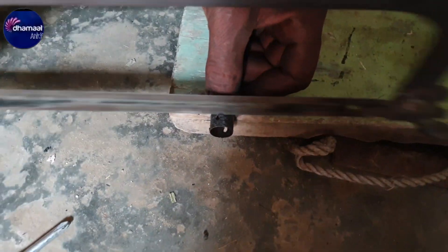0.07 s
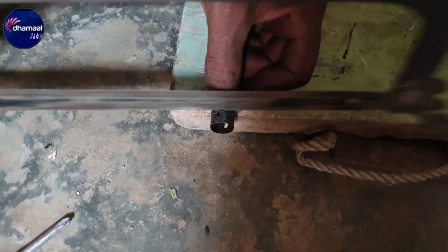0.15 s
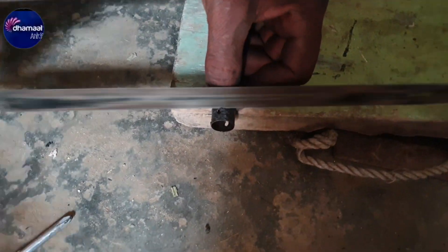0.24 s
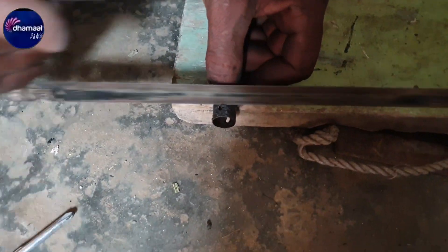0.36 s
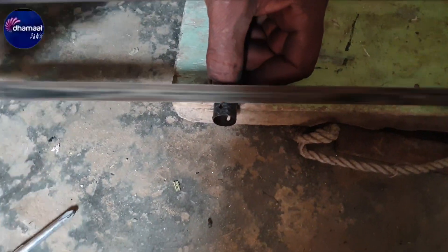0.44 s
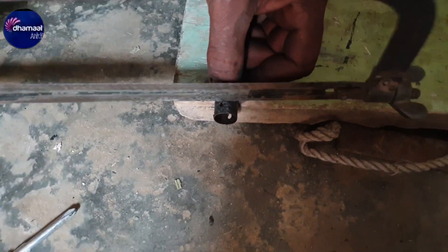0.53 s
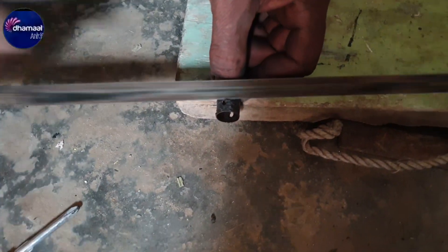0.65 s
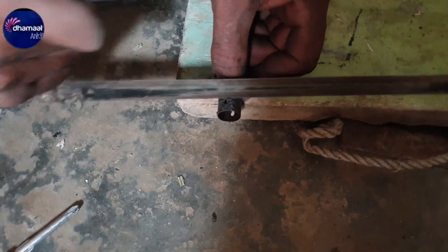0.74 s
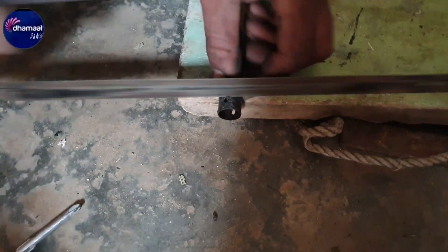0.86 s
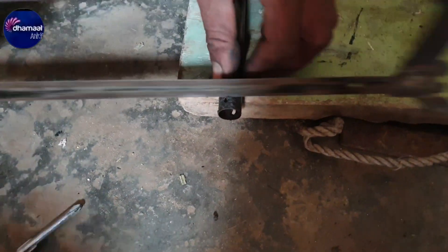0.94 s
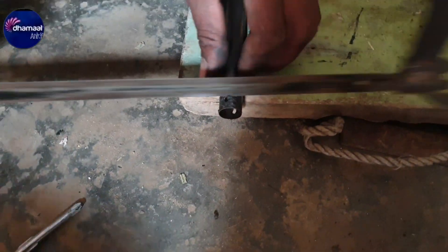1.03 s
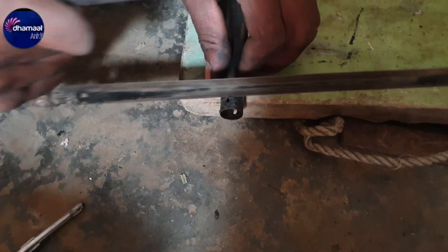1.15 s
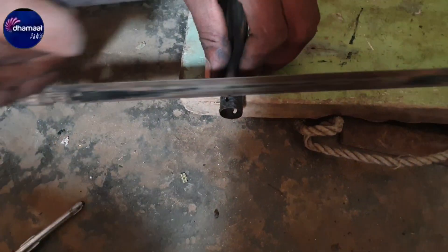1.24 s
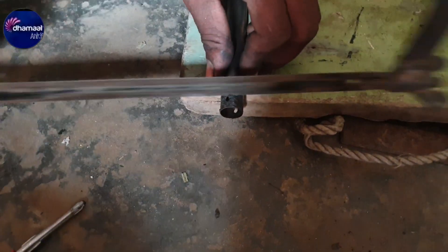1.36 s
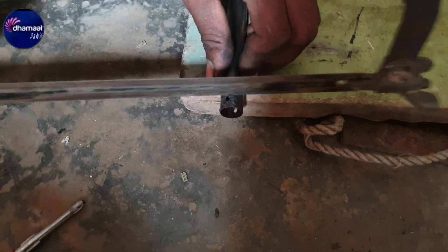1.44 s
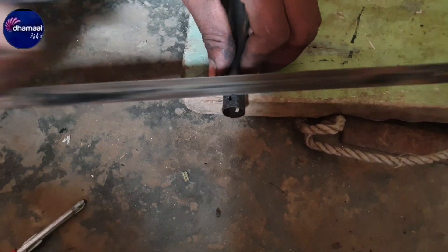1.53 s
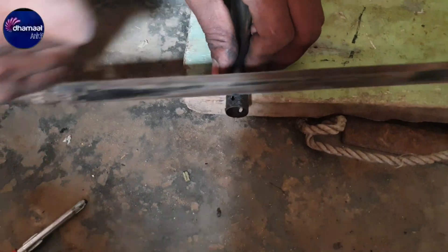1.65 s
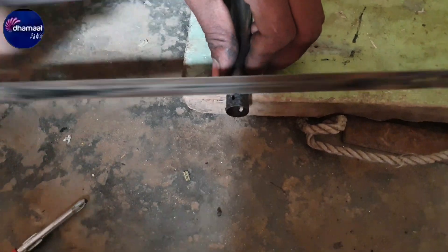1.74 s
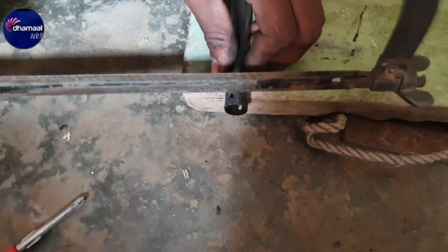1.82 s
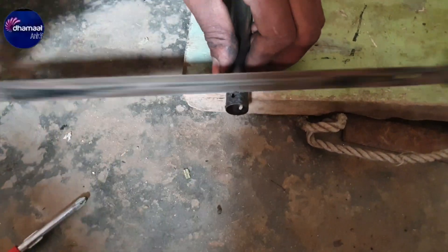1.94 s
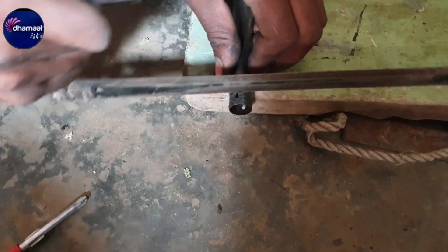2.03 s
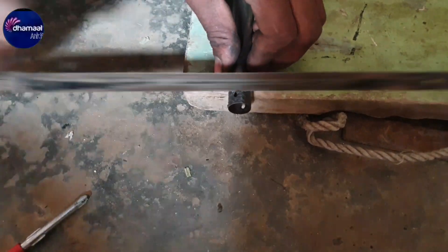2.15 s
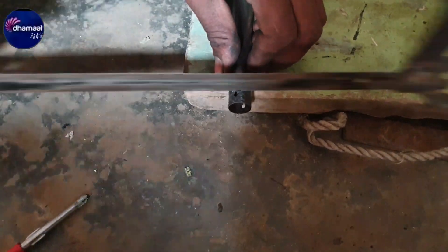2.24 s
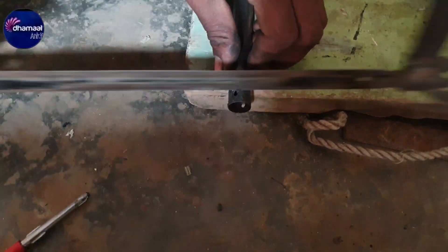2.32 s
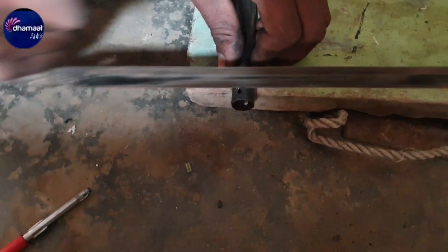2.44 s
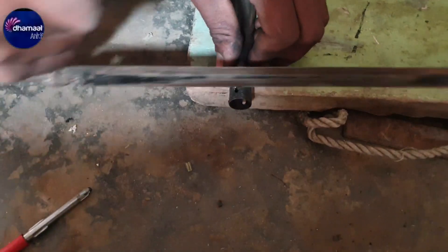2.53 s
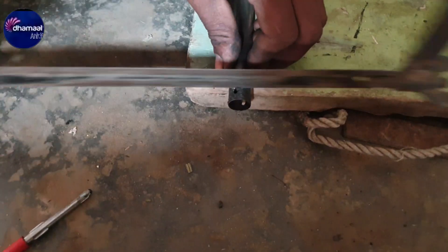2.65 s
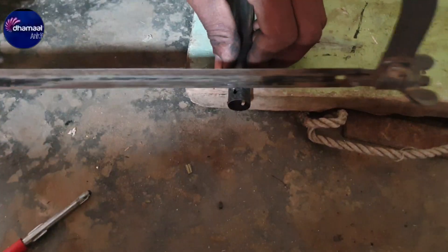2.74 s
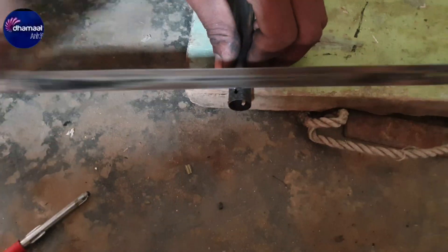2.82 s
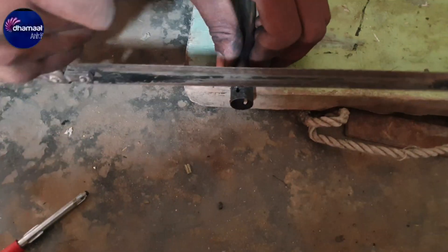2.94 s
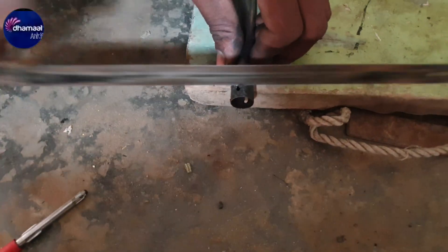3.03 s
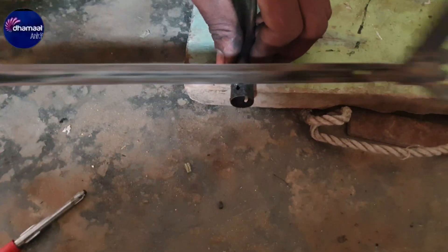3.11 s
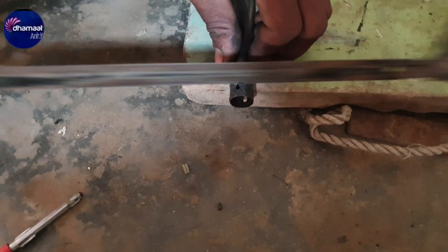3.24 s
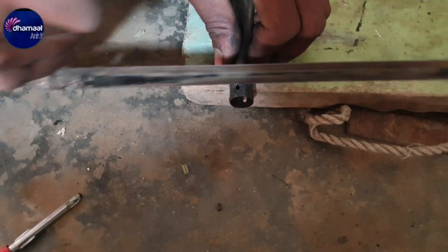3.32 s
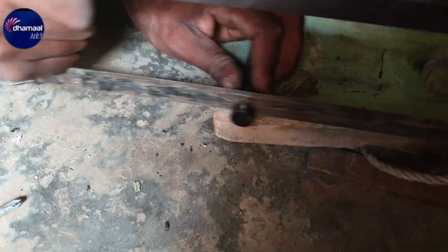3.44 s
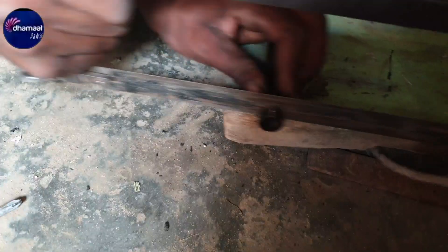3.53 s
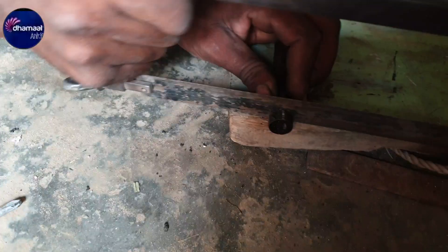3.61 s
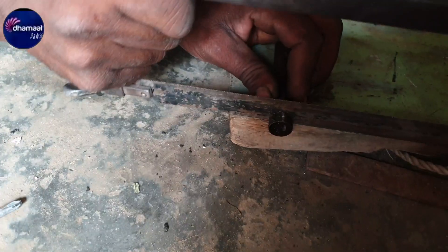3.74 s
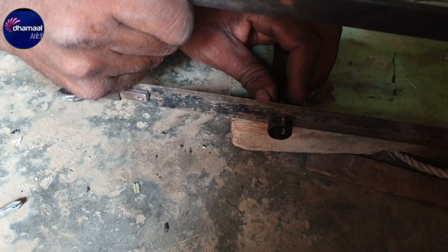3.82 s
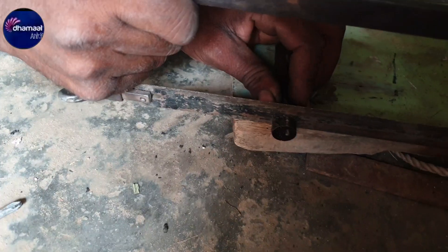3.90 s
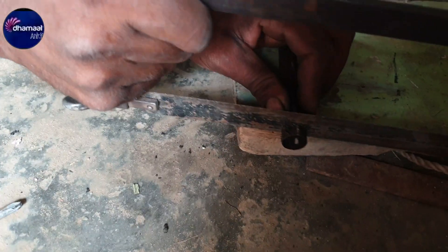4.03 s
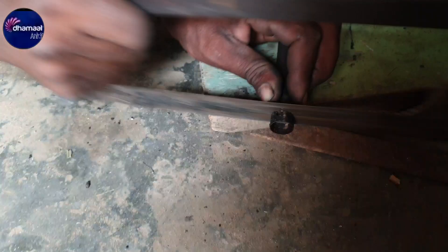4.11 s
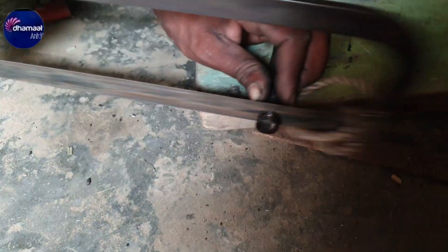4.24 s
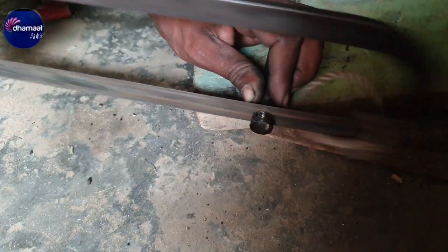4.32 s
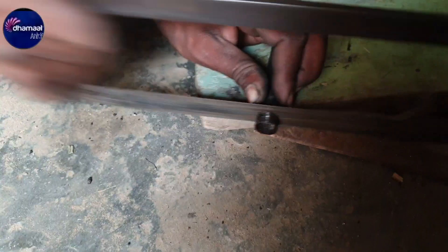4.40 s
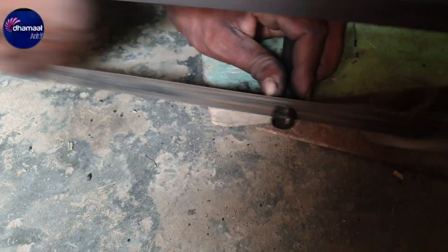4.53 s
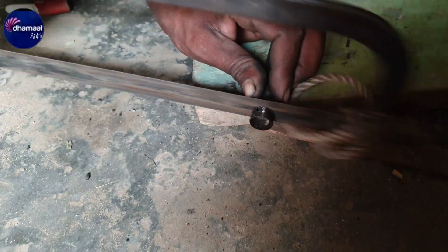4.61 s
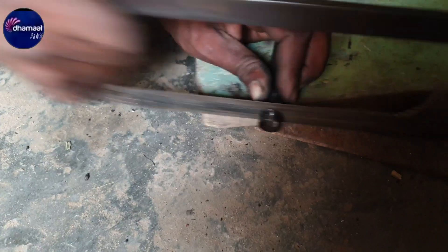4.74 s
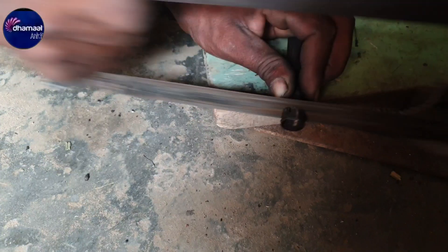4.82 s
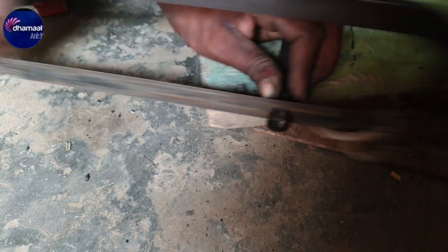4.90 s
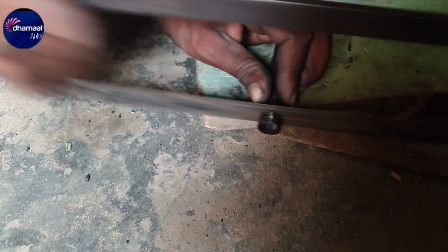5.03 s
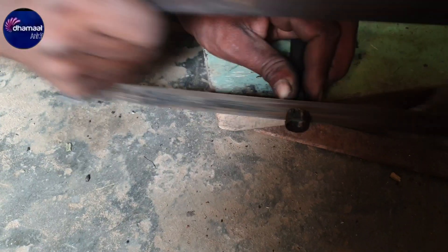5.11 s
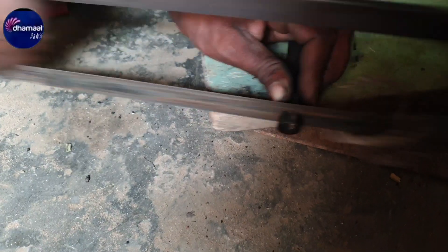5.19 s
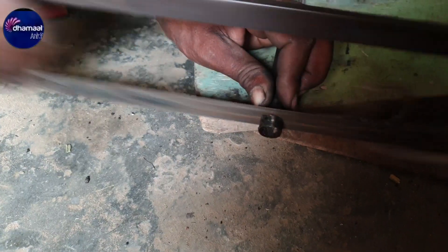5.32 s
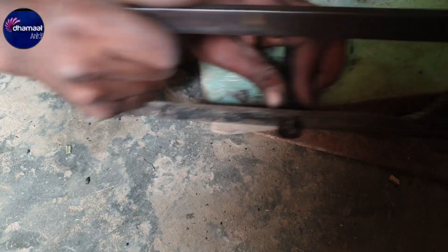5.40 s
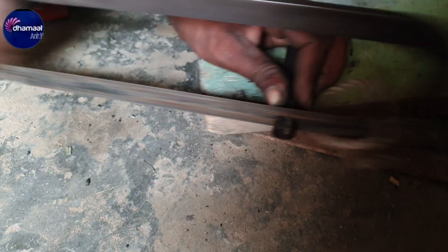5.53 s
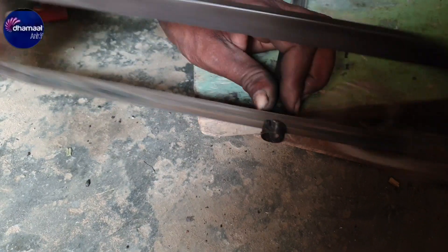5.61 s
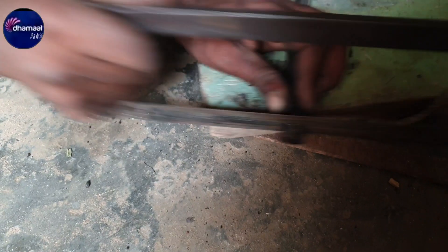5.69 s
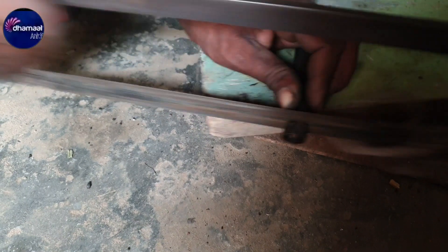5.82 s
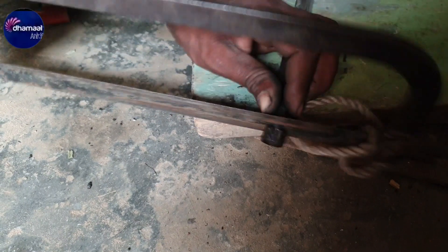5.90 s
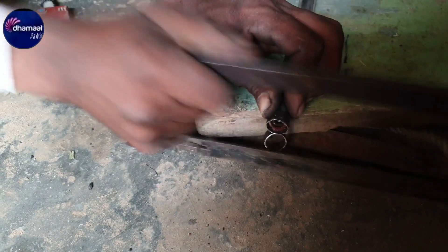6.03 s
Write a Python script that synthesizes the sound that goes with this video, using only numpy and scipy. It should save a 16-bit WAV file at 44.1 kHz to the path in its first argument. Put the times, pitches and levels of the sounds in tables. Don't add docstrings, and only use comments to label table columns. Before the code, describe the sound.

A hacksaw rasps rapidly back and forth through a small metal pipe, pauses briefly, then resumes faster with hard wooden knocks.

```python
import sys
import numpy as np
from scipy import signal
from scipy.fft import rfft, irfft, next_fast_len
from scipy.io import wavfile
from scipy.ndimage import uniform_filter1d

SR = 44100
rng = np.random.default_rng(int(sys.argv[2]) if len(sys.argv) > 2 else 0)


def undo_db(level):
    steps = np.asarray(level, float) / 20
    return 10 ** steps


def generate_wav(signal):
    frames = np.transpose(np.atleast_2d(signal))
    scaled = np.clip(frames, -1, 1) * 32767
    pcm = np.round(scaled).astype(np.int16)
    wavfile.write(sys.argv[1], SR, pcm)


N = 267246
T = np.arange(N) / SR
SECOND_BOUT_S = 4.1125

# frequency in Hz, width in Hz, resting level in dB.
HUM_LINES = [
    (50.5, 16, -50.5),
    (136.6, 5.2, -68),
    (186, 21, -57),
    (214.5, 11, -58),
    (385, 16, -66),
]
# peak time in seconds, level in dB, rise in seconds, fall in seconds.
HUM_SWELLS = [
    [(.04, -37.5, .05, 0.069), (.5, -31, 0.095, 0.058), (1.65, -43, 0.25, 0.46), (3.72, -51, .06, 0.079), (4.05, -43, 0.059, 0.065), (4.36, -48, .08, 0.05), (5.85, -51, 0.12, 0.078)],
    [(3.63, -37, .03, .05), (3.71, -34, 0.039, 0.061), (3.79, -38, .05, .02), (3.89, -42, .02, .02), (3.97, -37, 0.045, .05), (4.3, -47, .25, 2.5)],
    [(1.7, -50, .5, 0.67), (3, -48.5, .5, 0.044), (3.62, -44.5, 0.036, 0.46), (5.86, -45, 0.048, 0.054)],
    [(.65, -51, 0.75, .1), (3.7, -58, .06, 0.26), (5.87, -48, 0.044, .04)],
    [(.33, -37, .08, .3), (1.18, -37.5, 0.092, .2), (2.55, -36, 0.088, .15), (3.03, -31, 0.095, 0.026), (3.4, -46, 0.099, .1)],
]
# time in seconds, frequency in Hz, level in dB.
ENGINE_PATH = [(1.0, 62.4, -49), (1.34, 62.8, -47), (1.51, 58.45, -44), (1.78, 63.8, -47),
               (3.08, 65.2, -38.5), (3.11, 65.3, -52), (3.6, 65, -49)]
# frequency in Hz, level in dB per Hz.
AIR_SPECTRUM = [(15, -51), (25, -26), (53, -9), (77, 6), (139, 7.5), (202, -14), (257, 6), (286, 7.5),
                (383, 3.5), (729, 1.5), (1240, -4.5), (3400, -20), (7480, -22), (11000, -37), (15000, -55)]

# start in seconds, fastest tooth rate in Hz, cutting force in dB, frame ring over it in dB,
# place of the crest from 0 to 1.
FIRST_BOUT = [(-.02, 1017, -31, 16.5, 0.37), (.19, 1350, -26, 4.5, 0.46), (.402, 1397, -25.5, 8, 0.37),
              (.605, 1411, -22, 4, 0.59), (.826, 1327, -26.5, 13, 0.36), (1.046, 1282, -26.5, 6, 0.55),
              (1.259, 1269, -28, 8, 0.46), (1.486, 1294, -25.5, 4.5, 0.45), (1.688, 1010, -29, 7.5, 0.47),
              (1.909, 1270, -27, 6, 0.47), (2.122, 1350, -29, 10.5, 0.53), (2.343, 1273, -26, 4, 0.42),
              (2.563, 1279, -28.5, 11, 0.43), (2.784, 1263, -23.5, 4.5, 0.46), (2.996, 1244, -29, 10, .36),
              (3.215, 847.7, -33.5, 5.5, 0.46), (3.432, 1297, -23.5, 6.5, 0.55),
              (3.75, 502, -70, -18, 0.22), (3.885, 499, -62.5, 30.5, .2), (3.95, 498.6, -55, -3, 0.19),
              (4.12, 485.7, -58, 0, .5)]
SECOND_BOUT = [(4.06, 902, -19, 2, 0.48), (4.253, 1402, -18, -1.5, 0.41), (4.409, 1307, -23, -1.5, 0.51),
               (4.571, 1492, -22, -3.5, 0.4), (4.729, 1203, -19, -2, 0.48), (4.898, 1350, -23, -4, 0.46),
               (5.047, 1298, -22, -1.5, 0.44), (5.217, 1496, -25, -4.5, 0.49), (5.367, 1306, -26, 2, 0.45),
               (5.537, 1507, -27, -2.5, .45), (5.681, 1160, -22.5, 6, 0.48), (5.855, 1504, -19.5, -6, 0.51),
               (6.005, 904, -37, 3.5, 0.27), (6.08, 891, -46, -1, .5)]
# time in seconds, unevenness from 0 to 1.
UNEVEN_BITE = [(0, 0.19), (.5, 0.29), (.7, 0.36), (2.4, 0.55), (3.1, 0.29), (4.1, 0.34), (5, 0.29),
               (5.5, 0.5), (5.77, 0.29)]
# frequency in Hz, width in Hz, level in dB.
FRAME_MODES = [
    [(722, 24, 3), (745, 24, 2), (777.3, 24.4, -0.5), (857.2, 18, -3), (877.3, 19, -3), (904, 25, -8.5)],
    [(653.5, 16, -11.5), (711.5, 15.7, 2.5), (768, 28, -4.5), (862, 18.4, 2.5), (914, 49, -16)],
]
# frequency in Hz, width in Hz, level in dB.
BLADE_MODES = [
    [(990, 34, -2.5), (1040, 14, -4), (1190, 24, -24), (1256, 26, 0.5), (1350, 35, 0), (1368.3, 47, 2.5), (1580, 49, -17.5), (1715, 25, -3), (1950, 49, -9), (2056, 67, -2.5), (2167, 12, -15), (2434, 22, -8), (2753, 49, -14), (2837, 36, -8.5)],
    [(1176, 450, -14), (1565, 43, -1), (1720, 40, -10.5), (1997, 93, -3.5), (2410, 44, -13.5), (2494, 27, -7)],
]
# frequency in Hz, level in dB per Hz.
BLADE_BED = [
    [(120, -61), (200, -36.5), (374, -16), (610, -27), (736, -21), (1110, -13), (1260, -9), (1470, -14), (2080, -16.5), (4000, -36.5), (5200, -69), (8800, -120)],
    [(120, -55), (200, -45), (475, -7), (709, -1.5), (970, -6), (1140, -9), (2010, -6), (3530, -11), (4000, -8), (5200, -53), (8800, -120)],
]
# frequency in Hz, level in dB per Hz.
CHIP_SPECTRUM = [
    [(1760, -5), (3000, -8.5), (3260, -20), (3540, -10), (4160, -13), (4740, -7), (5300, -7.5), (5880, -2.5), (6310, -4), (9240, -12.5), (12000, -21.5), (14900, -19.5), (15800, -46)],
    [(1760, -21), (3000, -12), (3240, -13), (3590, -40), (3930, -12.5), (4280, -15.5), (4710, -12.5), (5610, -1.5), (6310, -7), (8680, -8.5), (9700, -16.5), (14800, -27.5), (15800, -23)],
]
PATCH_HZ = [3200, 4200, 5200, 6100, 7100, 8300, 9700, 11500, 13500]
PIPE_HZ = [3636, 4853, 5305, 5470, 5545, 5690, 5900, 6110, 6604, 7575, 8470, 9390]
# width in Hz, level in dB.
PIPE_RINGS = [(25, -18), (25, -18), (12, -20), (10, -14), (9, -13), (14, -11), (11, -13), (12, -17),
              (9, -14), (20, -28), (25, -18), (12, -12)]

# start in seconds, length in seconds, pitch in Hz, level in dB.
SQUEALS = [(0.026, 0.03, 736, -13), (1.119, 0.036, 726, -11.5), (1.546, 0.025, 740, -11),
           (1.786, 0.046, 722, -10), (2.86, 0.036, 736, -14), (3.07, 0.065, 740, -8.5),
           (3.289, 0.019, 791, -15), (3.312, 0.015, 782.6, -18), (3.511, 0.075, 761, -10.5),
           (5.748, 0.052, 1157, -12), (5.908, 0.012, 1247, -10), (4.127, 0.019, 1990, -17),
           (3.026, 0.075, 2167, -30), (0.05, 0.049, 995, -11.5), (0.423, 0.035, 760, -15),
           (1.748, 0.034, 995, -14.5), (2.231, 0.089, 770, -20), (4.119, 0.058, 718, -18.5),
           (0.063, 0.032, 1950, -25), (4.3, 0.024, 1350, -19), (4.332, 0.021, 1560, -18.5),
           (4.477, 0.027, 1307, -21), (4.65, 0.028, 1565, -21), (4.782, 0.018, 1150, -20),
           (4.835, 0.032, 871, -20), (4.873, 0.033, 876, -28), (0.476, 0.048, 1355, -19),
           (2.66, 0.047, 1260, -21), (0.263, 0.078, 1310, -19.5), (1.728, 0.031, 1248, -21.5),
           (1.81, 0.037, 1270, -19.5), (2.21, .07, 1270, -24), (2.391, 0.041, 1239, -20),
           (2.0, 0.034, 782, -19.5), (2.84, 0.031, 1263, -23), (3.585, 0.038, 754, -17),
           (3.641, 0.084, 1080, -37), (.12, 0.042, 730, -16), (3.915, 0.044, 800, -46),
           (5.11, .04, 1297, -26), (.44, .03, 950, -20), (.458, .025, 1160, -20), (.86, .04, 2050, -24),
           (.01, .025, 735, -15), (3.165, .016, 765, -19), (3.137, .016, 750, -17), (1.585, .03, 750, -17),
           (1.3, .03, 760, -19), (2.7, .06, 760, -19)]
# start in seconds, length in seconds, pitch in Hz,
# level in dB.
CHIRPS = [(1.11, .08, 1250, -22), (1.53, .025, 1275, -22), (1.585, .05, 1280, -24), (3.05, .035, 1260, -22),
          (3.11, .04, 1270, -23), (3.04, .03, 1000, -23), (3.29, .06, 865, -25), (3.24, .06, 1260, -30),
          (3.525, .022, 1260, -19), (3.56, .018, 1400, -20), (3.592, .018, 1400, -21),
          (5.39, .11, 722, -22), (5.285, .055, 850, -25), (5.595, .05, 855, -26), (5.28, .06, 1560, -28),
          (5.12, .04, 800, -21), (5.728, .028, 900, -18), (5.798, .03, 920, -18), (5.912, .03, 1590, -24),
          (6.018, .04, 722, -30)]
# start in seconds, length in seconds, pitch in Hz, level in dB.
WHISTLES = [(.245, .03, 6050, -36), (.49, .07, 5720, -34), (2.43, .04, 5700, -34), (2.86, .05, 5690, -35),
            (3.78, .26, 3120, -70), (.1, .2, 5680, -44), (.74, .13, 5660, -43), (.76, .1, 5545, -44),
            (.98, .12, 5665, -48), (1.2, .12, 5650, -49), (1.37, .13, 5665, -44), (2.03, .17, 5545, -46),
            (2.7, .1, 5660, -46), (2.7, .1, 5545, -49), (2.68, .12, 5305, -48), (3.54, .05, 5520, -36),
            (.26, .11, 6604, -42), (.52, .1, 6604, -42), (.78, .08, 6620, -44), (.95, .09, 6604, -44),
            (1.34, .15, 6604, -42), (2.18, .1, 6604, -44), (3.14, .06, 6604, -44), (5.71, .045, 5650, -30),
            (5.795, .04, 5650, -31), (5.9, .1, 5640, -31)]
# start in seconds, length in seconds, pitch in Hz, level in dB.
GROANS = [(5.834, .028, 195, -35), (5.868, .018, 195, -40), (5.886, .028, 195, -36)]
# time in seconds, peak in dB, mode in Hz, lull before it in dB.
SNAGS = [(0.015, -5, 730, 2), (0.032, -1, 750, 3), (0.127, -11, 733, 1), (0.215, -18, 850, 1),
         (0.255, -9, 1230, 9), (0.417, -4, 756, 9), (0.434, -5, 759, 8), (0.472, -2, 1270, 6),
         (0.498, -4, 1260, 3), (0.648, -13, 728, 1), (0.85, -9, 753, 7), (0.871, -2, 970.6, 4),
         (1.079, -13, 725, -1), (1.301, -11, 759.3, 1), (1.369, -5, 719, 5), (1.391, -6.5, 764, 5),
         (1.416, -6, 870, 2), (1.51, -18, 774, 0), (1.551, -8, 743, 4), (1.941, -10, 832, 6),
         (1.967, -5, 738, 3), (2.171, -11, 710, 10), (2.2, -9, 728.4, 3), (2.227, -9, 738, 3),
         (2.363, -12, 844, 7), (2.482, -5, 727.5, 9), (2.574, -14, 746, 11), (2.596, -7, 748, 8),
         (2.621, -4, 727, 3), (2.749, -6, 777, -1), (2.825, -9, 815.4, 10), (2.844, -6, 726, 7),
         (3.011, -5, 780, 12), (3.049, -7, 770, 3), (3.168, -5, 770, 12), (3.241, -15, 730, 9),
         (4.281, -5, 725.5, 3), (4.597, -9.5, 804, 2), (4.629, -9, 1378, -1), (5.243, -16, 727, 4),
         (5.561, -18, 1614, 2), (5.885, -11, 786, 2)]

# time in seconds, peak in dB, contact in milliseconds, pitch ratio.
KNOCKS = [(4.113, -9.5, 0.24, 0.88), (4.413, 0, 0.26, 0.94), (4.739, -0.5, 0.16, 0.96),
          (5.058, -1.5, 0.19, 0.95), (5.382, -1, 0.28, 0.95), (5.691, -0.5, 0.35, 0.95),
          (6.016, -19, 0.36, 0.81), (3.894, -27, 0.9, 0.79), (3.911, -23, 0.87, 0.57),
          (4.922, -18, 0.27, 0.77), (5.911, -9, 0.12, 1.1), (3.566, -6.0, 0.5, 1.15)]
# frequency in Hz, level in dB, decay time t60 in seconds.
BLOCK_MODES = [(446, -11, 0.041), (647.1, -7.5, 0.12), (750, 3, 0.065), (2700, -2, .025), (1160, 17, 0.023),
               (1790, 7.5, 0.062), (2040, 6.5, 0.057)]


def level(x):
    return x / np.sqrt(np.mean(x ** 2))


def even(x, span_s):
    k = int(span_s * SR)
    power = uniform_filter1d(uniform_filter1d(x ** 2, k), k)
    return x / np.sqrt(power + 1e-9)


def ring(x, hz, width):
    return signal.lfilter(*signal.iirpeak(hz, hz / max(width, 1), fs=SR), x)


def colour(x, points):
    hz, db = np.transpose(points)
    size = next_fast_len(N)
    f = np.arange(size // 2 + 1) * SR / size + 1
    gain = undo_db(np.interp(np.log(f), np.log(hz), db))
    return irfft(rfft(x, size) * gain, size)[:N]


def walk(rate, size=16):
    k = int(SR / rate / size)
    held = np.repeat(rng.standard_normal(N // size // k + 2), k)
    coarse = uniform_filter1d(uniform_filter1d(held, k), k)
    return level(np.interp(np.arange(N) / size, np.arange(len(coarse)), coarse))


def shifted(x, order):
    return np.roll(x, order * (len(x) // 17))


def surroundings():
    out = undo_db(-47.5 + 3 + walk(11.0)) * level(colour(rng.standard_normal(N), AIR_SPECTRUM))
    for (hz, width, rest_db), swells in zip(HUM_LINES, HUM_SWELLS):
        line = ring(ring(rng.standard_normal(N), hz, width), hz, width)
        gain = undo_db(rest_db)
        for s, db, rise, fall in swells:
            gain = gain + undo_db(db) * np.exp(-np.abs(T - s) / np.where(T < s, rise, fall))
        out += gain * undo_db(1.5 * walk(4)) * even(line, .07)
    s, hz, db = np.transpose(ENGINE_PATH)
    engine_hz = np.interp(T, s, hz) * (1 + 0.032 * walk(12.8))
    phase = 2 * np.pi * np.cumsum(engine_hz) / SR
    outside_s = np.maximum(np.maximum(s[0] - T, T - s[-1]), 0)
    engine_db = np.interp(T, s, db) + 2.0 * walk(9.05)
    return out + np.sqrt(2) * undo_db(engine_db) * np.exp(-outside_s / 0.17) * np.sin(phase)


def motion():
    bouts = []
    for rows in (FIRST_BOUT, SECOND_BOUT):
        start, top_hz, force_db, frame_db, crest = np.transpose(rows)
        crest_s = start[:-1] + np.diff(start) * np.clip(crest[:-1], .1, .9)
        place = np.interp(T, np.sort(np.r_[start, crest_s]), np.arange(2 * len(start) - 1) / 2)
        bouts.append((np.pi * (place % 1), top_hz[place.astype(int)],
                      np.interp(T, crest_s, force_db[:-1]), np.interp(T, crest_s, frame_db[:-1])))
    return np.where(T < SECOND_BOUT_S, *bouts)


def efforts(stroke, bout):
    angle, top_hz, force_db, ring_db = stroke
    turn_db = ((20.2, 23.1, 22.8), (15.3, 17.6, 22.2))[bout]
    turn_power = ((1.4, 1.33, 1.08), (1.4, 1.39, 1))[bout]
    skew = np.where(angle < np.pi / 2, (1.155, 1.13)[bout], 1)
    dips = [db * (1 - np.sin(angle)) ** (power * skew) for db, power in zip(turn_db, turn_power)]
    lock_db = 1.5 * np.exp(-((top_hz * np.sin(angle) - 760) / 160) ** 2)
    blade_over_force_db, blade_share = (4.5, -0.6)[bout], (0.36, 0.53)[bout]
    frame_db = force_db + ring_db + lock_db - dips[0]
    blade_db = force_db + blade_over_force_db + blade_share * ring_db - dips[1]
    return frame_db, blade_db, force_db - dips[2]


def teeth(stroke, slowest_hz=150, scatter_db=9, wobble=.04):
    angle, top_hz = stroke[:2]
    hz = slowest_hz + (top_hz - slowest_hz) * np.sin(angle)
    phase = np.cumsum(hz * (1 + wobble * walk(60))) / SR
    at = np.flatnonzero(np.diff(np.floor(phase)))
    chance = rng.standard_normal((12000, 2))[:len(at)]
    uneven = np.clip(np.interp(T[at], *np.transpose(UNEVEN_BITE)), 0, 1)
    when = np.clip(at + uneven * chance[:, 0] * SR / hz[at] / 2, 0, N - 2)
    size = undo_db(scatter_db * uneven * chance[:, 1])
    blows = np.zeros(N)
    np.add.at(blows, when.astype(int), size * (1 - when % 1))
    np.add.at(blows, when.astype(int) + 1, size * (when % 1))
    return blows


def woken(x, modes, rate_hz, size=16):
    wander_db, out = 2.2 * walk(14)[::size], 0
    for k, (hz, width, db) in enumerate(modes):
        near_db = 3.5 * np.exp(-((rate_hz[::size] - hz) / 140) ** 2) + shifted(wander_db, k)
        drive = np.repeat(undo_db(db + near_db), size)[:N]
        out = out + (-1) ** k * ring(x * drive, hz, width)
    return out


def shimmer(x, t60_s, share, count=3):
    t, out = T[:SR // 4], x.copy()
    for _ in range(count):
        response = rng.standard_normal(len(t)) * 1000 ** (-t / t60_s)
        response /= np.sqrt(count * np.sum(response ** 2))
        out += share * signal.fftconvolve(x * walk(7), response)[:N]
    return out


def patchy(x):
    flare = undo_db(1.6 * walk(55) - .3) - 1
    return x + sum(shifted(flare, k) * ring(x, hz, hz / 7) for k, hz in enumerate(PATCH_HZ))


def pipe_rings(rasp, rasp_db, angle, bout):
    late_db = (-5.5, -12)[bout] + 8 * (angle / np.pi - .65)
    struck = undo_db(late_db) * 12 * rasp * np.clip((rasp_db + 56) / 12, 0, 1)
    contact = undo_db(2.5 * walk(5))
    out = 0
    for k, (hz, (width, db)) in enumerate(zip(PIPE_HZ, PIPE_RINGS)):
        out = out + undo_db(db) * ring(struck * shifted(contact, k), hz, width)
    return out


def saw():
    stroke = motion()
    tooth_hz = stroke[1] * np.sin(stroke[0])
    blows = teeth(stroke) * undo_db(0.68 * walk(110))
    puff = signal.lfilter([1], [1, -np.exp(-1 / (0.00015 * SR))], blows)
    chips = rng.standard_normal(N) * (2.3 + level(puff)) * undo_db(0.5 * walk(40))
    scrape = level(puff - np.mean(puff)) + 0.99 * level(chips)
    catch = walk(80)
    bite, out = snags()
    treble = signal.butter(2, 8000, "high", fs=SR, output="sos")
    for bout, on in enumerate((T < SECOND_BOUT_S, T >= SECOND_BOUT_S)):
        frame_db, blade_db, rasp_db = efforts(stroke, bout)
        frame = even(woken(scrape, FRAME_MODES[bout], tooth_hz), 0.025)
        bed = level(shimmer(colour(scrape, BLADE_BED[bout]), 0.097, 0.65))
        blade = even(level(woken(scrape, BLADE_MODES[bout], tooth_hz)) + 0.72 * bed, 0.018)
        steel = shimmer(colour(chips, CHIP_SPECTRUM[bout]), .04, .6)
        rasp = undo_db(rasp_db + 1.37 * catch) * patchy(even(steel, 0.012))
        rasp += (undo_db(0.14 * (rasp_db + 23.0)) - 1) * signal.sosfilt(treble, rasp)
        pipe = pipe_rings(rasp, rasp_db, stroke[0], bout)
        body = undo_db(frame_db + 0.68 * catch) * frame + undo_db(blade_db + 1.23 * catch) * blade
        out += on * (bite * body + bite ** .4 * rasp + pipe)
    return signal.sosfilt(signal.butter(4, 192, "high", fs=SR, output="sos"), out)


def handle():
    angle, _, force_db, _ = motion()
    line = ring(ring(rng.standard_normal(N), 382, 52), 382, 52)
    swell_db = force_db + 21.5 - 14 * np.cos(angle) ** 2
    return undo_db(np.where(T < SECOND_BOUT_S, -38, -52) + 0.3 * swell_db) * even(line, .07)


def squeals():
    out, waver, throb = np.zeros(N), 0.011 * walk(50), undo_db(2.2 * walk(90))
    for s, length, hz, db in SQUEALS + CHIRPS + WHISTLES + GROANS:
        span = slice(int(s * SR), int((s + length) * SR))
        u = (T[span] - s) / length
        shape = np.clip(np.minimum(u / 0.18, (1 - u) / 0.22), 0, 1)
        pitch = hz + min(hz, 1300) * waver[span] - 22 * (1 - u) ** 2
        out[span] += undo_db(db + 2.5) * shape * throb[span] * np.sin(2 * np.pi * np.cumsum(pitch) / SR)
    return out


def snags():
    gain_db, out, t = np.zeros(N + SR), np.zeros(N + SR), T[:SR // 8]
    lull_s, surge_s, t60_s = 0.0057, 0.0078, 0.072
    for s, db, hz, lull_db in SNAGS:
        i = int(s * SR)
        gain_db[max(i - len(t), 0):i] -= lull_db * np.exp(-t[:i][::-1] / lull_s)
        gain_db[i:i + len(t)] += lull_db * 0.25 * np.exp(-t / surge_s)
        envelope = 1000 ** (-t / t60_s) * (1 - np.exp(-t / .002))
        out[i:i + len(t)] += undo_db(db - 6.5) * np.sin(2 * np.pi * hz * t) * envelope
    return undo_db(gain_db[:N]), out[:N]


def knocks():
    t, out = T[:int(.15 * SR)], np.zeros(N + SR)
    rebound_s, seated_s = .0065, .0105
    late = int(rebound_s * SR)
    chances = rng.standard_normal((len(KNOCKS), len(BLOCK_MODES)))
    for (s, db, ms, pitch), chance in zip(KNOCKS, chances):
        body, rebound = np.zeros(len(t)), np.zeros(len(t))
        for (hz, mode_db, t60), c in zip(BLOCK_MODES, chance):
            mode = np.sin(2 * np.pi * hz * pitch * t) * 1000 ** (-t / t60)
            body -= undo_db(mode_db + 1.5 * c) * mode
            if t60 > .03:
                rebound += undo_db(mode_db) * mode
        body[late:] += undo_db(-5) * rebound[:-late]
        body *= undo_db(-6 * np.clip((t - seated_s) / .002, 0, 1))
        scuff = rng.standard_normal(len(t))
        for _ in range(3):
            scuff = ring(scuff, 1150, 1100)
        scuff = level(scuff) * np.exp(-t / .014)
        body = body / np.abs(body).max() + undo_db(-14 - 6) * scuff
        push = np.hanning(int(max(ms, .05) * SR / 1000) + 3)
        body = np.convolve(body * (1 - np.exp(-t / 0.00041)), push)
        i = int(s * SR)
        out[i:i + len(body)] += undo_db(db) * body / np.abs(body).max()
    return signal.sosfilt(signal.butter(4, 360, "high", fs=SR, output="sos"), out[:N])


def walls(near):
    t = T[:SR // 2]
    dull = signal.butter(1, 7000, fs=SR, output="sos")
    tail = signal.sosfilt(dull, rng.standard_normal(len(t))) * 1000 ** (-t / 0.29) * (t > .004)
    return undo_db(-14) * signal.fftconvolve(near, tail / np.sqrt(np.sum(tail ** 2)))[:N]


def scene():
    near = saw() + handle() + knocks() + squeals()
    return (near + walls(near) + surroundings())[None]


def band_limit(x):
    return signal.sosfilt(signal.butter(12, 15930, fs=SR, output="sos"), x)


def record(dry):
    x = signal.sosfilt(signal.butter(4, 38, "high", fs=SR, output="sos"), dry)
    rounded = np.tanh(0.87 * x) / 0.91
    mix = signal.sosfilt(signal.ellip(10, .2, 60, 15560, fs=SR, output="sos"), rounded)
    return band_limit(mix)


dry = scene()
out = record(dry)
generate_wav(out)
```